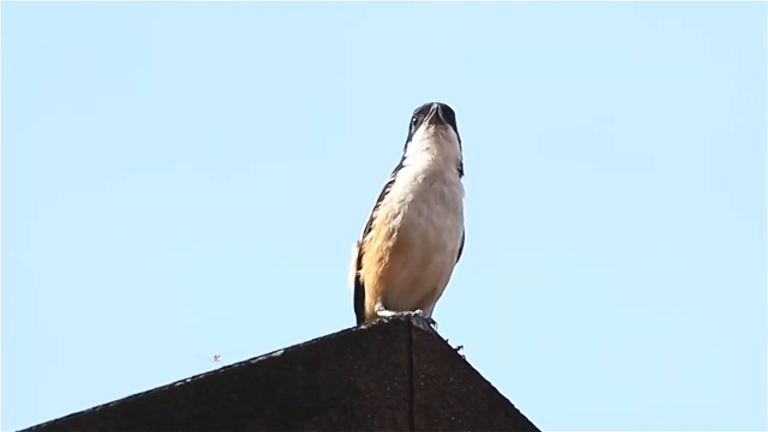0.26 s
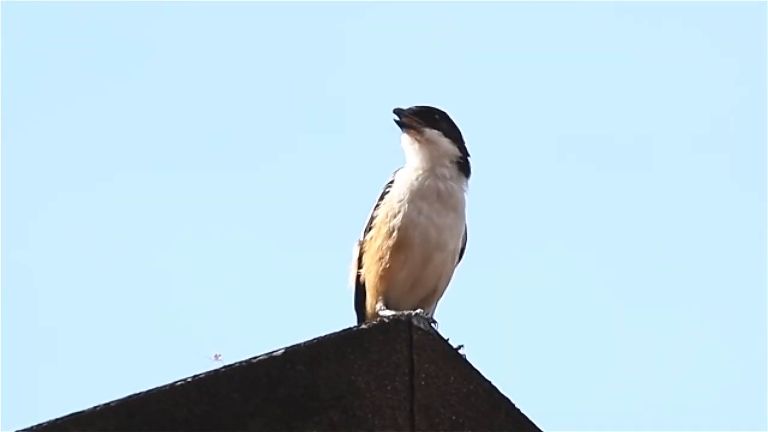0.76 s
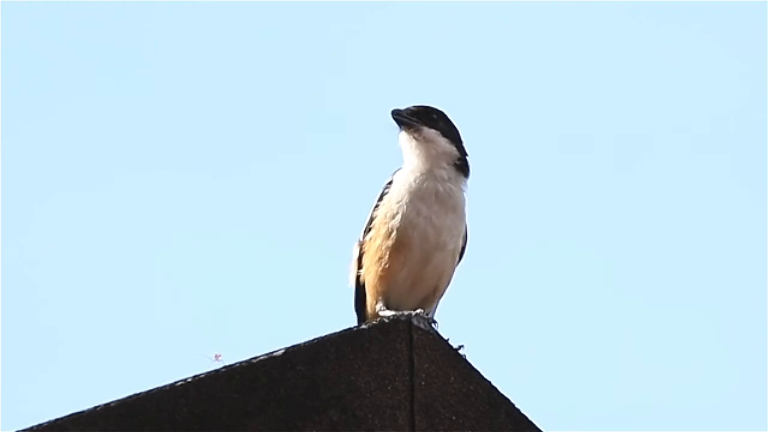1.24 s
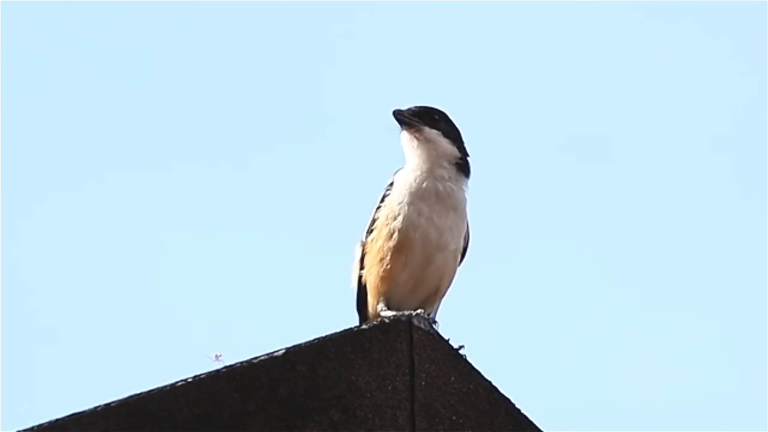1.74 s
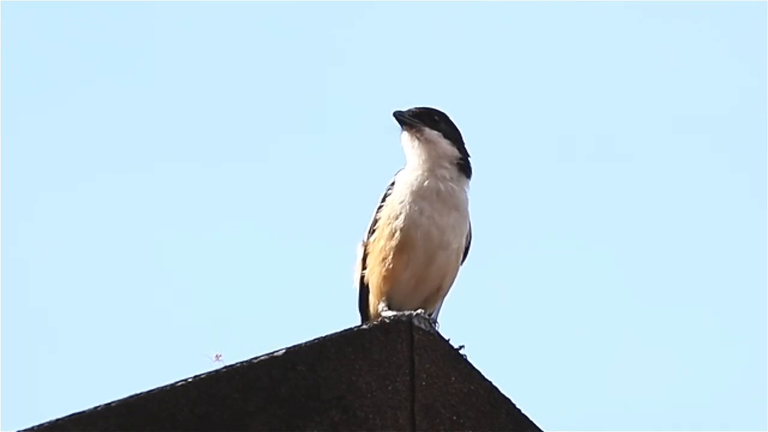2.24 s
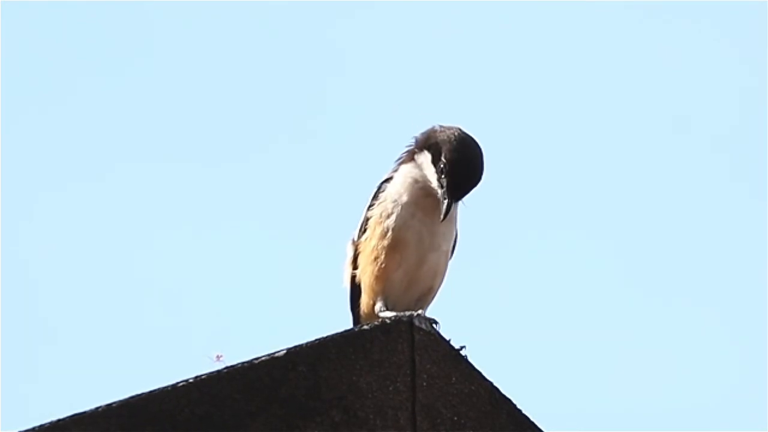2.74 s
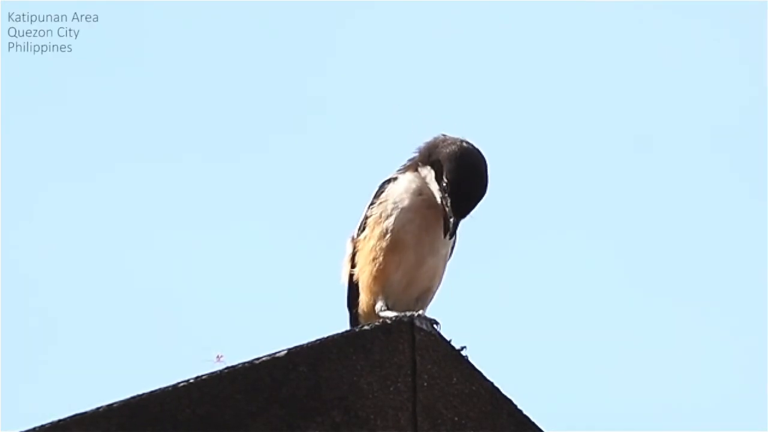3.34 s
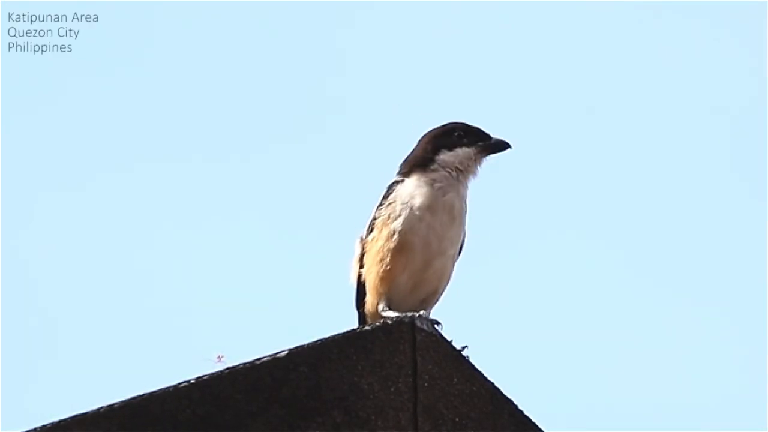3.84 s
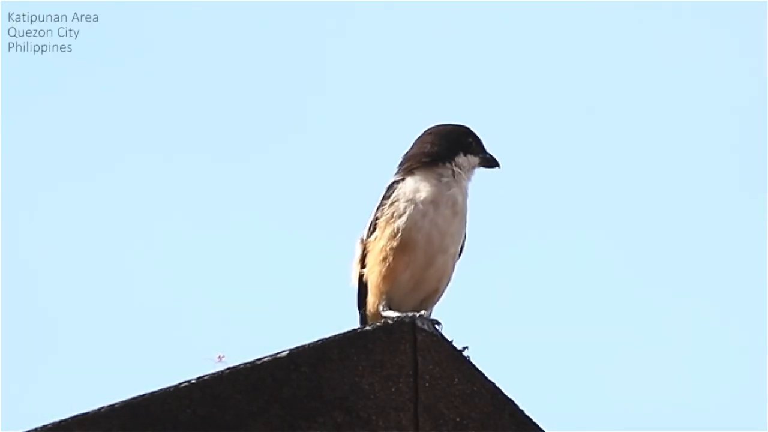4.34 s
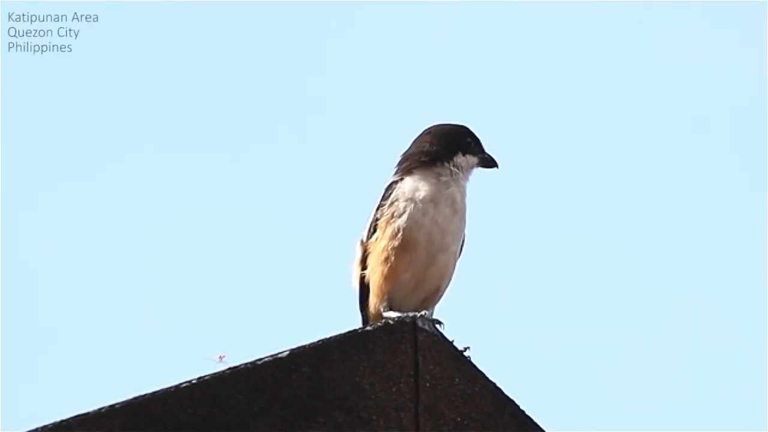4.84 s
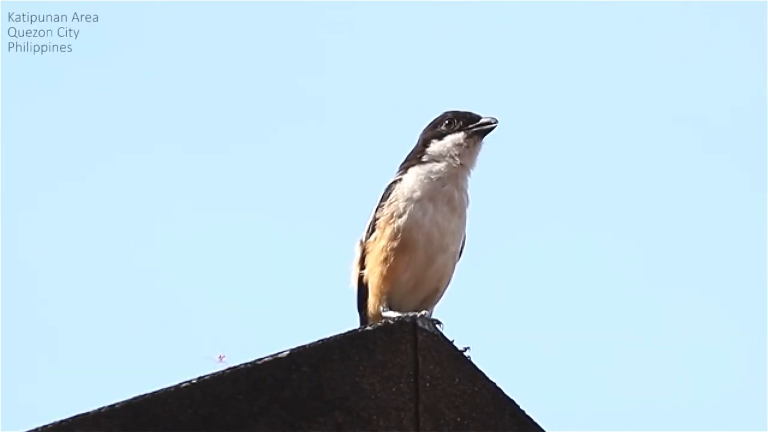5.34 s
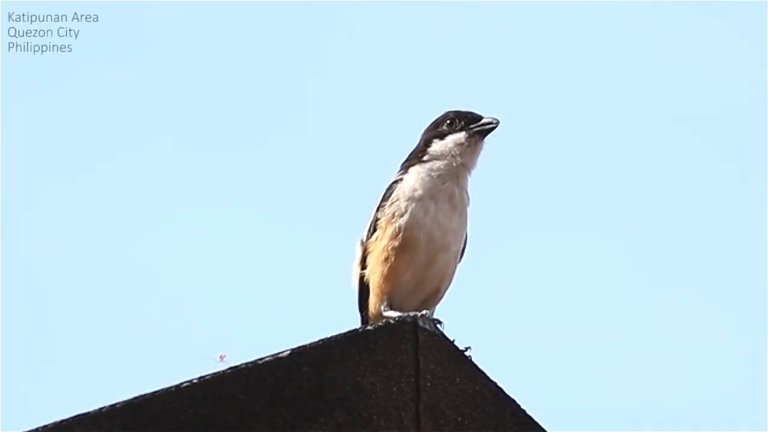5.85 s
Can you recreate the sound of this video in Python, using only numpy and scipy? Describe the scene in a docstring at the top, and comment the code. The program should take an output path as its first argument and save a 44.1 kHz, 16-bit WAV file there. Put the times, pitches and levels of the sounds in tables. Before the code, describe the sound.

Over a steady, quiet rumble of distant traffic, a bird gives a few soft rasps, then four loud, harsh notes with short gaps between them. It moves on to thin downward whistles and pips before ending with two scratchy notes. Other birds call faintly, and a far rooster crows near the end. The microphone picks up the singer directly, along with brief reflections from nearby buildings.

```python
"""Over the rumble of a town, far birds call and a shrike on a roof peak starts a soft chatter.
It breaks into four loud scratchy notes: the two sides of its syrinx buzz at unrelated pitches
through one throat, and the houses around answer. Thin falling whistles follow, each from one
membrane alone, while a far rooster crows. Two more loud scratchy notes close the song."""
import sys
import numpy as np
from scipy import signal
from scipy.fft import rfft, irfft, next_fast_len
from scipy.io import wavfile
from scipy.ndimage import uniform_filter1d, map_coordinates

SR = 44100
rng = np.random.default_rng(int(sys.argv[2]) if len(sys.argv) > 2 else 0)


def transcribe(signal):
    """Save signal, clipped to [-1, 1], as a 16-bit WAV file at the path in sys.argv[1]."""
    frames = np.atleast_2d(signal).T
    limited = np.clip(frames, -1, 1)
    pcm = np.round(limited * 32767).astype(np.int16)
    wavfile.write(sys.argv[1], SR, pcm)


N = 268569


def shrike():
    """The dry song: scratchy notes, clear tones and falling whistles."""
    # Scratchy notes: start_s, length_s, crest_s (into the note), level_db, swell_db, throat_start_hz,
    # throat_end_hz, throat_width_hz, low_voice_hz, high_voice_hz, glide_octaves_per_s,
    # roughness (0-1), beak_db, top_db, top_hz
    rasps = [ (0.293, 0.13, 0.088, -37, 12, 3150, 2320, 230, 665, 844, -0.047, 0.09, -22, -50.5, 13000),
             (0.472, 0.08, .026, -31.5, 22, 3250, 2730, 373, 662, 919.5, -0.015, .16, -29, -71, 13000),
             (1.174, 0.062, 0.043, -42, 15.5, 3520, 3080, 203, 713, 852, 0.14, 0.17, -41, -67, 13000),
             (1.346, 0.05, 0.032, -35.5, 19, 3630, 3640, 264, 732, 992, 0.18, 0.23, -44, -59, 13200),
             (1.735, .1, 0.063, -14, 20.5, 3930, 4860, 700, 632, 890, -0.25, 0.44, -33.5, -68.5, 13300),
             (1.998, 0.11, 0.082, -13, 12, 4480, 4290, 650, 653.4, 895, -0.28, 0.61, -24, -50.5, 12800),
             (2.421, 0.18, 0.091, -14.5, 10, 4640, 3820, 743, 620.4, 811, -.55, 0.33, -0.5, -45, 13400),
             (3.388, .18, 0.14, -24.5, 8, 3600, 4160, 695, 692, 868, -0.43, .3, 0.5, -30, 14300),
             (5.582, 0.11, 0.041, -24, 3, 4550, 3200, 670, 608.6, 935, -0.53, 0.47, -46, -88, 14000),
             (5.943, .101, 0.048, -24, 6.5, 4470, 3530, 593, 639, 879, -0.35, 0.46, -45, -65.5, 14000), ]
    song = np.zeros(N)
    for start_s, *row in rasps:
        add(song, start_s, rasp(*row))
    return song + clear_tones() + falling_whistles()


def rasp(length_s, crest_s, level_db, swell_db, start_hz, end_hz, width_hz,
         low_hz, high_hz, glide, roughness, beak_db, top_db, top_hz, throb_hz=112, throb_depth=0.22):
    """Both membranes and turbulent air, throbbing together through one throat."""
    t, envelope = note(length_s, crest_s, swell_db)
    bend = 2 ** (glide * (t - t.mean()))
    jitter = 0.0375 * roughness
    buzz = unit(membrane(low_hz * bend, jitter) + 1.03 * membrane(high_hz * bend, jitter))
    source = np.sqrt(1 - roughness) * buzz + roughness * rng.standard_normal(len(t))
    body = throat(source, length_s, start_hz, end_hz, width_hz, beak_db)
    body /= np.sqrt(uniform_filter1d(body ** 2, size=130) + 0.33)  # the membranes' swing is bounded
    body = filtered(body, lambda hz: 1 / np.sqrt(1 + (hz / 6080) ** 140))  # steep low-pass
    top = filtered(source, lambda hz: bell(hz, top_hz, width_hz=400))  # faint high overtones
    throb = 1 + throb_depth * np.cos(phase_of(throb_hz * (1 + 0.14 * wobble(60, len(t)))))
    return envelope * amp(level_db) * unit(throb) * (unit(body) + amp(top_db) * unit(top))


def membrane(hz, jitter, wander=0.008):
    """One side of the syrinx: sharp pulses whose pitch jitters fast and wanders more slowly."""
    unsteady = 1 + jitter * wobble(457.2, len(hz)) + wander * wobble(69.44, len(hz))
    harmonics = np.arange(1, 24)[:, None]
    return unit(np.cos(harmonics * phase_of(hz * unsteady)).sum(axis=0))


def throat(source, length_s, start_hz, end_hz, width_hz, beak_db):
    """A sliding resonance that passes little below it; a steady beak resonance adds brightness."""
    # Overall colour of the throat: frequency_hz, gain_db
    colour = [(1400, -24.5), (2100, -17), (2550, 10.5), (3000, -0.5), (3700, 4.5), (4800, 3.5), (5700, 2),
              (5980, -4.5), (6250, -59), (7500, -43)]
    hz, frame_s, spectrum = signal.stft(source, SR, nperseg=256)
    hz = hz[:, None]
    peak_hz = np.interp(frame_s, [0, length_s], [start_hz, end_hz])
    low_cut = np.maximum(0.5 + 0.5 * np.tanh((hz - peak_hz + 1.16 * width_hz) / 90), amp(-36))
    beak = amp(beak_db) * bell(hz, centre_hz=5560, width_hz=280)
    shape = (bell(hz, peak_hz, width_hz) * low_cut + beak) * amp(along(colour, hz))
    shape /= np.linalg.norm(shape, axis=0) + 1e-9
    _, voiced = signal.istft(spectrum * shape, SR, nperseg=256)
    return unit(voiced[:len(source)])


def clear_tones(settle_s=0.012):
    """Short pips, and harmonics that ring out of a scratchy note; each slides onto a held pitch."""
    # Clear tones: start_s, length_s, first_hz, held_hz, level_db
    tones = [ (1.223, 0.051, 2770, 2887, -40.5), (1.358, 0.042, 2700, 2670, -40.5),
             (1.378, 0.053, 3000, 2914, -38), (1.777, 0.061, 2550, 2514, -42),
             (1.774, 0.059, 2690, 2700, -46), (2.04, 0.078, 2670, 2680, -51.5),
             (2.441, 0.065, 3220, 3255, -30.5), (2.467, 0.068, 2506, 2512, -37),
             (2.441, 0.061, 1590, 1612, -46.5), (2.551, 0.078, 2916, 2940, -41.5),
             (3.416, 0.079, 3010, 2795, -39.5), (3.491, .088, 2815, 2705, -35.5),
             (5.186, .034, 3370, 3616, -28), (5.438, 0.026, 3320, 3444, -28),
             (5.605, 0.043, 2450, 2510, -39.5), (5.635, .06, 2835, 3000, -32),
             (5.997, 0.044, 2610, 2810, -39), (6.011, 0.03, 3240, 3320, -25), ]
    song = np.zeros(N)
    for start_s, length_s, first_hz, held_hz, level_db in tones:
        t, envelope = note(length_s, crest_s=0.39 * length_s, swell_db=0)
        hz = held_hz + (first_hz - held_hz) * np.exp(-t / settle_s)
        add(song, start_s, amp(level_db) * envelope * whistle(hz))
    return song


def falling_whistles(swell_db_per_s=289.5):
    """Thin whistles that fall ever faster and swell until shortly before they end."""
    # Downward slurs: start_s, length_s, start_hz, end_hz, level_db
    slurs = [(4.194, .04, 4450, 3520, -35), (5.089, 0.035, 5830, 5700, -44),
             (5.119, 0.046, 4930, 4230, -40), (5.344, .082, 5900, 3990, -28.5)]
    song = np.zeros(N)
    for start_s, length_s, start_hz, end_hz, level_db in slurs:
        crest_s = max(length_s - 0.025, 0.017)
        t, envelope = note(length_s, crest_s, swell_db_per_s * crest_s)
        hz = start_hz + (end_hz - start_hz) * (t / length_s) ** 1.7
        add(song, start_s, amp(level_db) * envelope * whistle(hz))
    return song


def whistle(hz):
    """A fluttering sine tone from one membrane, which shakes more as it slackens."""
    fall_octaves_per_s = np.maximum(-np.gradient(np.log2(hz)), 0) * SR
    shake = np.minimum(0.003 + 0.003 * fall_octaves_per_s, 0.032)
    phase = phase_of(hz * (1 + shake * wobble(450, len(hz))))
    flutter = unit(amp(2 * wobble(130, len(hz))))
    return flutter * np.sqrt(2) * np.sin(phase)


def note(length_s, crest_s, swell_db, attack_s=0.017, release_s=0.018, shut_db=15, sag_db_per_s=87):
    """Time axis and envelope of a note: it opens quickly, swells to its crest, sags and closes."""
    t = np.arange(max(int(length_s * SR), 512)) / SR
    left_s = t[-1] - t
    gate = np.sin(np.pi / 2 * np.clip(np.minimum(t, left_s) / 0.0033, 0, 1)) ** 2  # click-free ends
    arch_db = -swell_db * np.maximum(1 - t / crest_s, 0) - sag_db_per_s * np.maximum(t - crest_s, 0)
    edges_db = -shut_db * (np.maximum(1 - t / attack_s, 0) + np.maximum(1 - left_s / release_s, 0))
    return t, gate * amp(arch_db + edges_db)


def echo(x, t60_s, build_s, spread=2.1, shared=0.11):
    """The buildings answer: a few strong reflections among many weak, partly shared by both ears."""
    t = np.arange(SR) / SR
    facets = np.exp(spread * np.clip(rng.standard_normal(SR), -3, 3))
    grain = np.sqrt(1 - shared) * rng.standard_normal((2, SR))
    grain += np.sqrt(shared) * rng.standard_normal(SR)
    tail = grain * facets * amp(-60 * t / t60_s) * (1 - np.exp(-(t / build_s) ** 2))
    tail /= np.linalg.norm(tail, axis=1, keepdims=True)
    return signal.fftconvolve(x[None], tail, axes=1)[:, :N]


def far_calls():
    """The fading echo of a call just ended, then far churrs and thin whistles, blurred by the streets."""
    # Noise bursts, first the fading echo, then the churrs: start_s, length_s, centre_hz, width_hz, level_db
    bursts = [(0, 0.017, 4240, 1000, -34), (0, 0.16, 2190, 265, -40.5), (0.04, 0.074, 2630, 191, -36),
              (0.7, 0.057, 1860, 314, -49), (0.934, 0.039, 5240, 193, -46), (2.78, 0.34, 2040, 132, -62.5),
              (4.6, .14, 5240, 167, -52.5), (4.72, 0.19, 2240, 275, -53)]
    # Far birds' whistles: start_s, length_s, pitch_hz, level_db
    whistles = [(0.771, 0.07, 1624, -52.5), (0.956, .06, 3890, -60.5), (2.874, .076, 2615, -64),
                (3.112, .15, 3945, -62.5), (3.767, 0.13, 4906, -54), (4.423, 0.064, 4840, -50)]
    calls = np.zeros(N)
    for start_s, length_s, centre_hz, width_hz, level_db in bursts:
        n = int(length_s * SR)
        band = lambda hz: bell(hz, centre_hz, width_hz)
        burst = unit(filtered(rng.standard_normal(n), lambda hz: band(hz) ** 2 + 0.062 * band(hz)))
        add(calls, start_s, amp(level_db) * burst * signal.windows.tukey(n, 0.3))
    for start_s, length_s, pitch_hz, level_db in whistles:
        n = int(length_s * SR)
        add(calls, start_s, amp(level_db) * whistle(np.full(n, pitch_hz)) * signal.windows.tukey(n, 0.3))
    return 0.41 * calls + 1.1 * echo(calls, t60_s=0.75, build_s=0.0011)


def rooster(hoarseness=0.042, octave_db=3, fade_db_per_s=4, edge_s=0.03):
    """A hoarse crow from far away, mostly echo; each syllable sinks and fades as it is held."""
    # Syllables of the crow: start_s, length_s, pitch_hz, level_db
    syllables = [(4.43, 0.23, 815.3, -51), (4.8, 1.3, 947.4, -47)]
    crow = np.zeros(N)
    for start_s, length_s, pitch_hz, level_db in syllables:
        t = np.arange(int(length_s * SR)) / SR
        hz = pitch_hz - 148 * t ** 1.6  # 148 Hz flat after one second
        phase = phase_of(hz * (1 + hoarseness * wobble(110, len(t))))
        voice = np.sin(phase) + amp(octave_db) * np.sin(2 * phase)
        gate = np.clip(np.minimum(t, length_s - t) / edge_s, 0, 1)
        add(crow, start_s, gate * amp(level_db - fade_db_per_s * t) * unit(voice))
    return 0.84 * crow + 1.43 * echo(crow, t60_s=1.0, build_s=0.0047)


def town():
    """The bed: traffic rumble, a wash of far street noise and a thin steady hiss."""
    # Spectral shapes of the three layers: frequency_hz, relative_db
    traffic = [(15, -84), (25, -27.5), (61, -5.5), (80, 1), (193, -2), (226, -5.5), (312, -8), (382, -11.5),
               (580, -15), (620, -25.5), (810, -43), (1360, -120)]
    wash = [(560, -49), (630, -2), (665, 4.5), (830, 0), (1050, -5.5), (1400, -10), (1750, -17.5),
            (2200, -33), (3200, -43), (4800, -63.5), (6000, -68)]
    hiss = [(4700, -26.5), (5250, -4), (5580, 14.5), (5800, -21.5), (6000, 12), (6200, -7), (7000, -1.5),
            (8000, 0.5), (9100, -9.5), (10200, -9.5), (10800, -11.5), (11150, -58)]
    return (amp(-44.5) * rush(traffic, sway_db=-0.5)
            + amp(-49.5) * rush(wash, sway_db=-0.3)
            + amp(-57) * rush(hiss, sway_db=1.53))


def rush(spectrum, sway_db):
    """Stereo noise that sways slowly in level, near mono in the bass and wide in the treble."""
    # Likeness of left and right: frequency_hz, correlation (0-1)
    likeness = [(60, 0.98), (110, 1), (220, 0.98), (410, 0.92), (780, 0.59), (1480, 0.37), (2800, 0.059),
                (5320, 0.069)]

    def mid_side_gains(hz):
        angle = np.arccos(along(likeness, hz)) / 2
        return amp(along(spectrum, hz)) * [np.cos(angle), np.sin(angle)]

    mid, side = filtered(rng.standard_normal((2, N)), mid_side_gains)
    return unit(np.array([mid + side, mid - side])) * amp(sway_db * wobble(2.82, N))


def amp(db):
    """Decibels to gain."""
    return 10 ** (np.asarray(db) / 20)


def unit(x):
    """x at rms 1."""
    return x / np.sqrt(np.mean(x ** 2) + 1e-20)


def phase_of(hz):
    """Running phase of a moving pitch, in radians."""
    return 2 * np.pi * np.cumsum(hz) / SR


def along(points, hz):
    """A curve of (frequency_hz, value) points read on a log axis."""
    points_hz, values = np.transpose(points)
    return np.interp(np.log(hz + 1), np.log(points_hz + 1), values)


def bell(hz, centre_hz, width_hz):
    """Gain of one rounded resonance."""
    return np.exp(-0.25 * ((hz - centre_hz) / width_hz) ** 2)


def wobble(knots_per_s, n):
    """A smooth random curve of n samples at rms 1."""
    knots = rng.standard_normal(int(n * knots_per_s / SR) + 4)
    return unit(map_coordinates(knots, [np.arange(n) * knots_per_s / SR]))


def filtered(x, response):
    """x through a filter whose gain is response(hz)."""
    n = x.shape[-1]
    padded = next_fast_len(n + 4096)
    return irfft(rfft(x, padded) * response(np.fft.rfftfreq(padded, 1 / SR)), padded)[..., :n]


def add(track, start_s, x):
    """Mix x into the track at start_s."""
    part = track[max(round(start_s * SR), 0):][:len(x)]
    part += x[:len(part)]


def scene(lean_left_db=0.66):
    """The shrike heard directly, off near walls and down the street, with the town behind it."""
    song = shrike()
    walls = amp(-5.5) * echo(song, t60_s=0.38, build_s=0.0011)
    street = amp(-23) * echo(song, t60_s=0.95, build_s=0.02)
    mix = amp(-4.5) * song + walls + street + far_calls() + rooster() + town()
    return mix * amp([[lean_left_db], [-lean_left_db]])


def record(dry):
    """A brick-wall high cut at 15.7 kHz."""
    return filtered(dry, lambda hz: hz < 15700)


dry = scene()
out = record(dry)
transcribe(out)
```